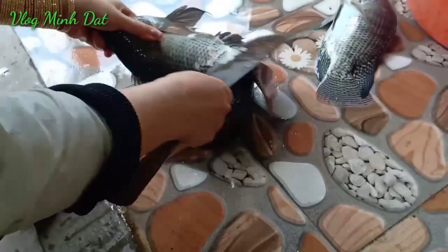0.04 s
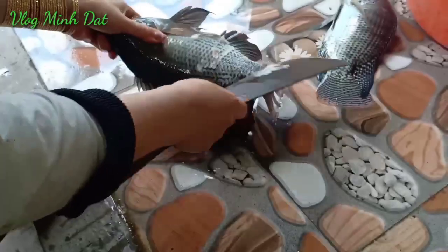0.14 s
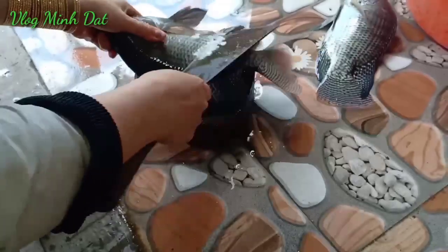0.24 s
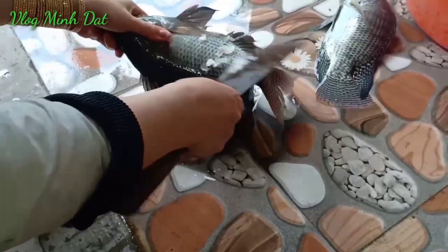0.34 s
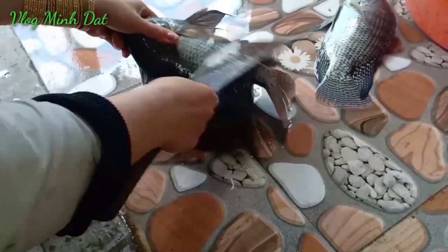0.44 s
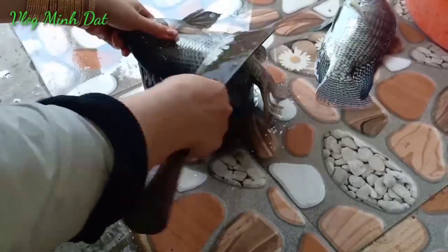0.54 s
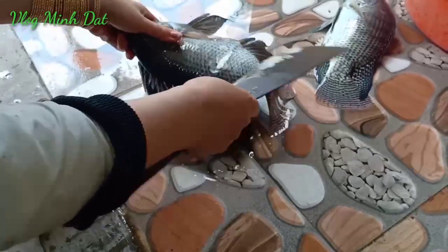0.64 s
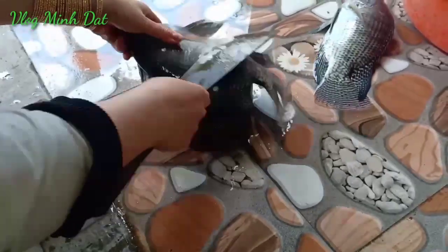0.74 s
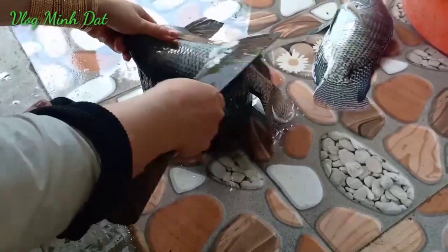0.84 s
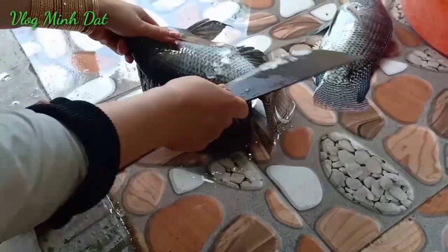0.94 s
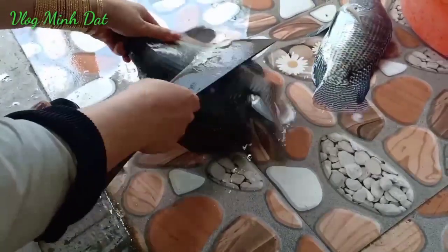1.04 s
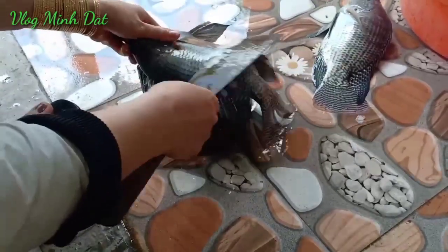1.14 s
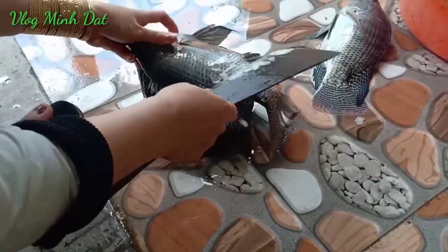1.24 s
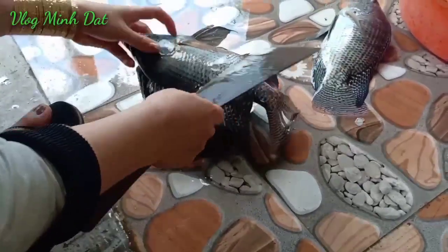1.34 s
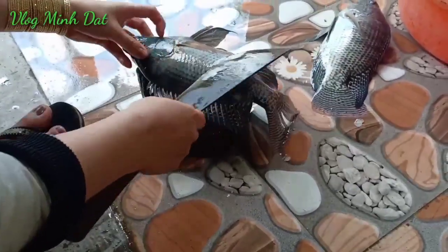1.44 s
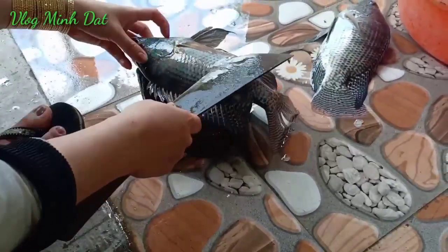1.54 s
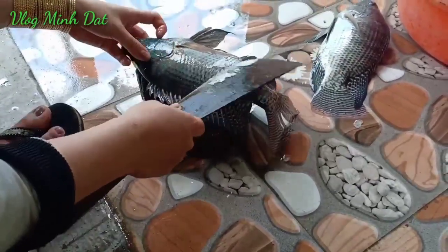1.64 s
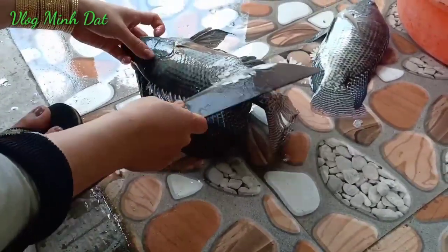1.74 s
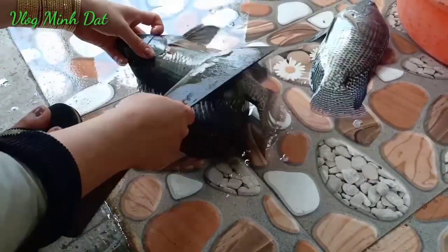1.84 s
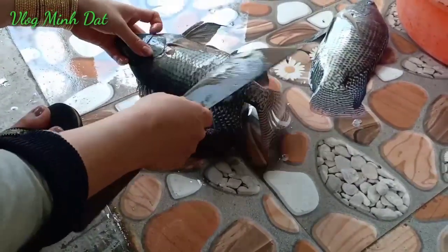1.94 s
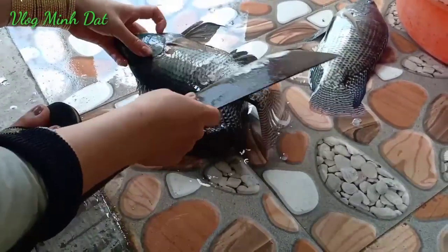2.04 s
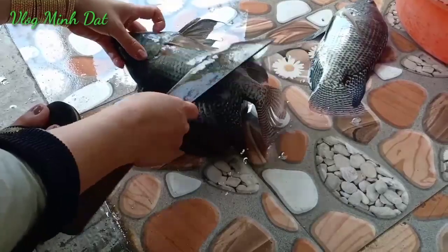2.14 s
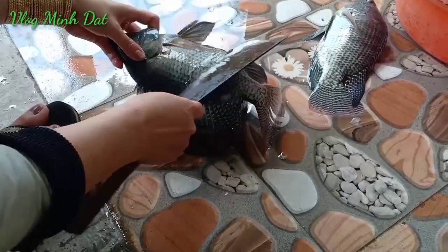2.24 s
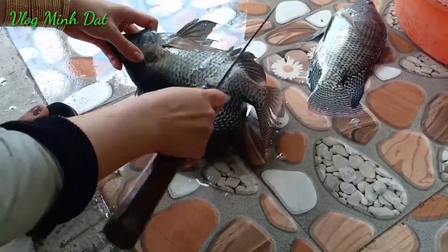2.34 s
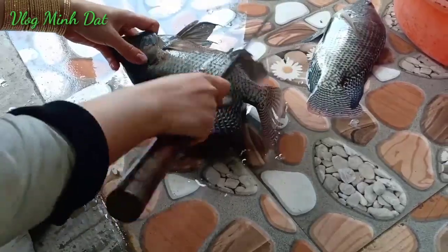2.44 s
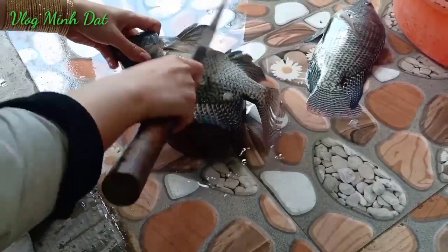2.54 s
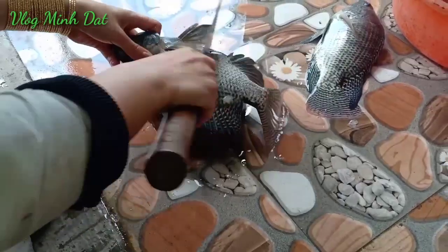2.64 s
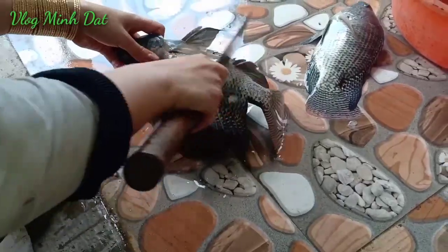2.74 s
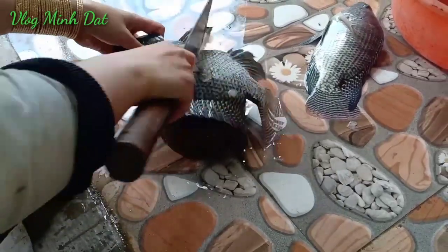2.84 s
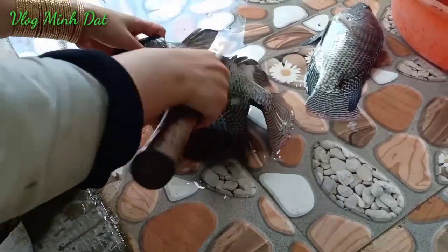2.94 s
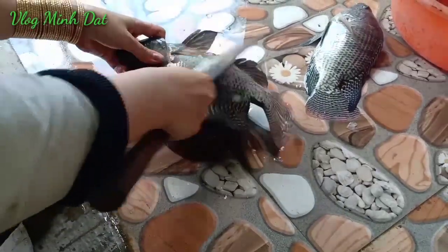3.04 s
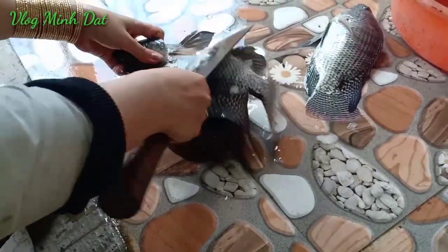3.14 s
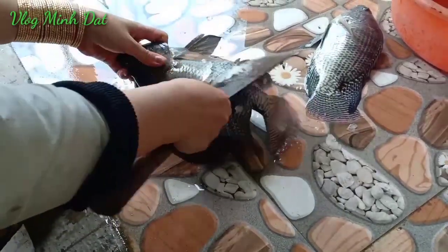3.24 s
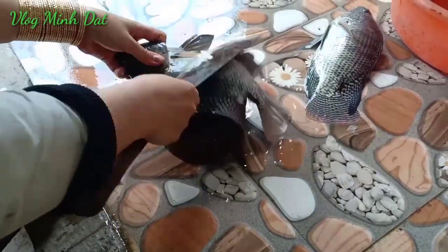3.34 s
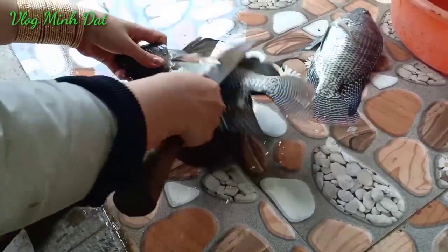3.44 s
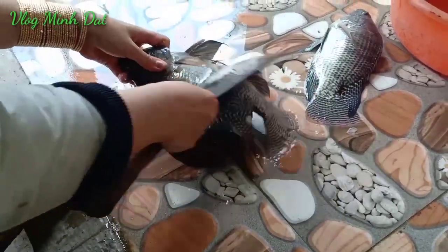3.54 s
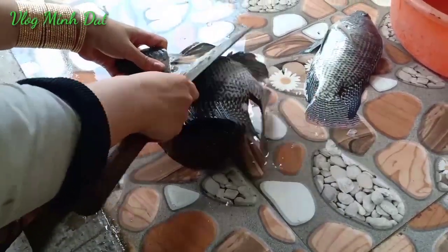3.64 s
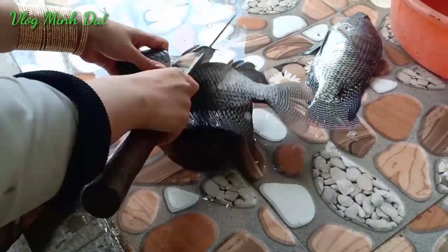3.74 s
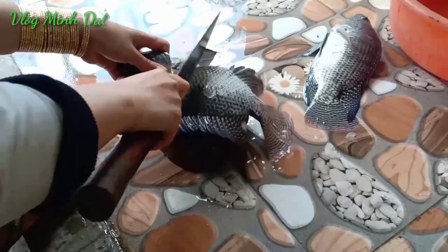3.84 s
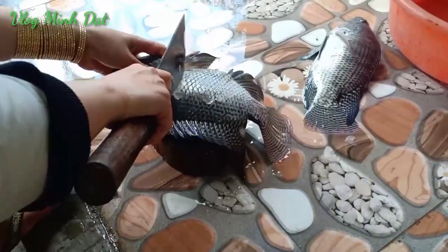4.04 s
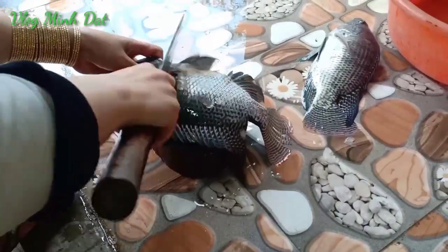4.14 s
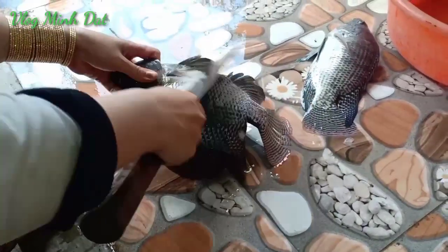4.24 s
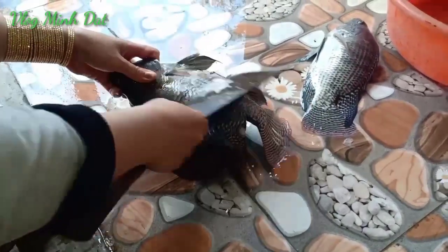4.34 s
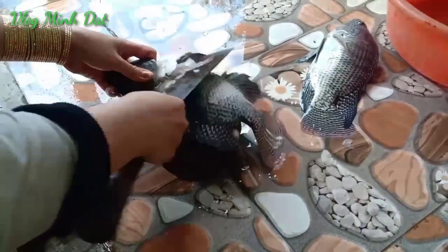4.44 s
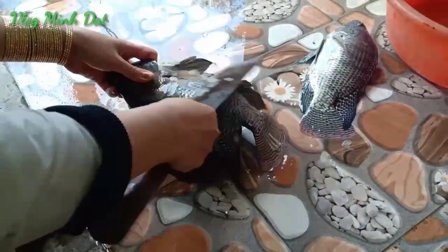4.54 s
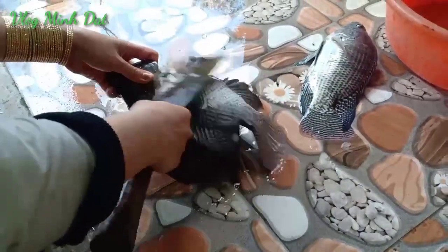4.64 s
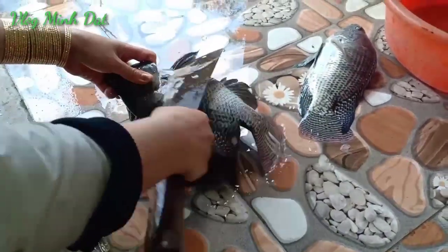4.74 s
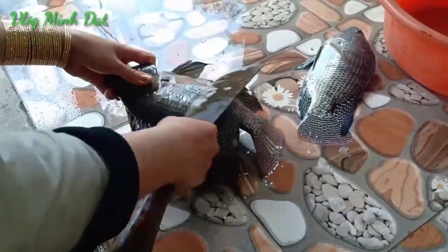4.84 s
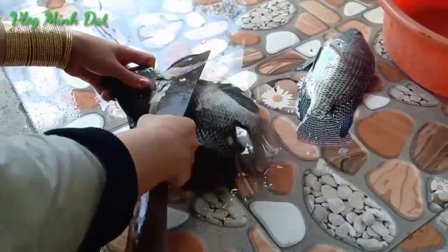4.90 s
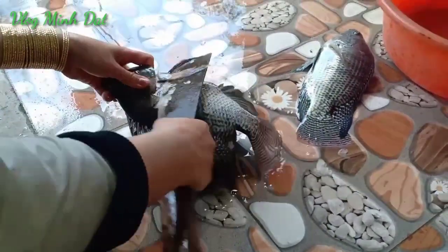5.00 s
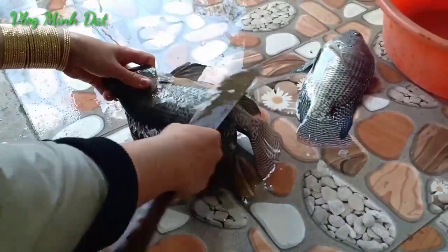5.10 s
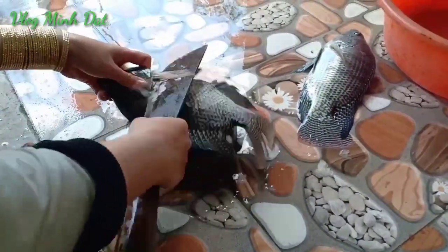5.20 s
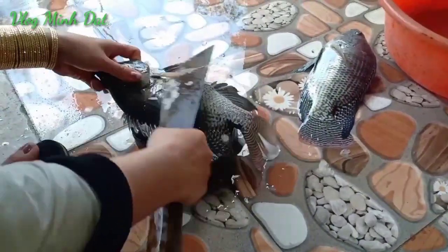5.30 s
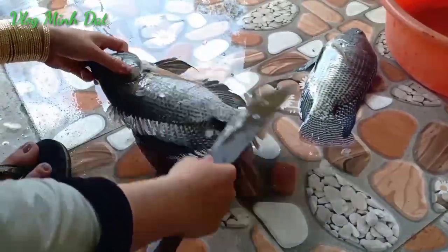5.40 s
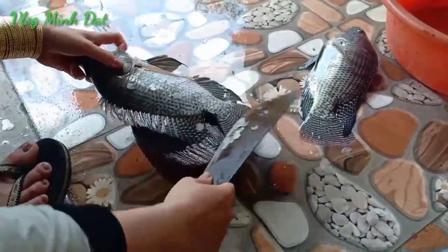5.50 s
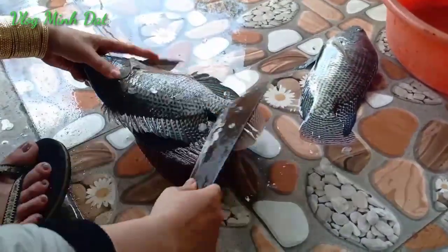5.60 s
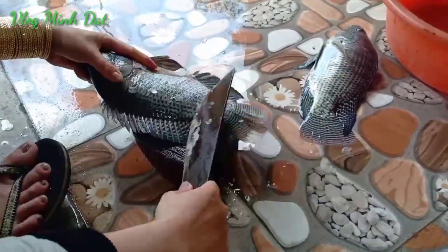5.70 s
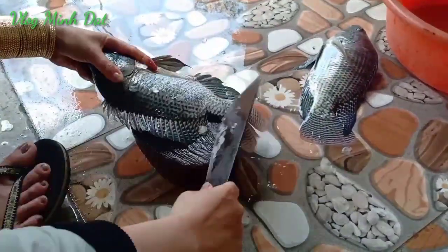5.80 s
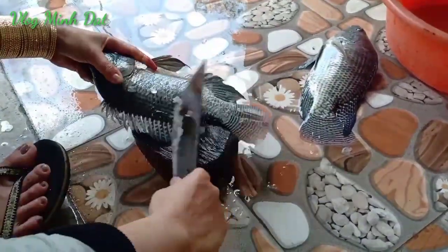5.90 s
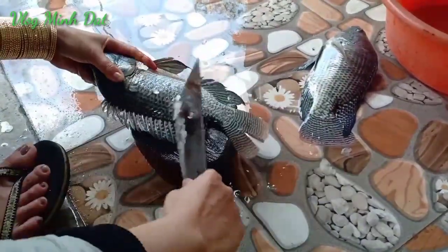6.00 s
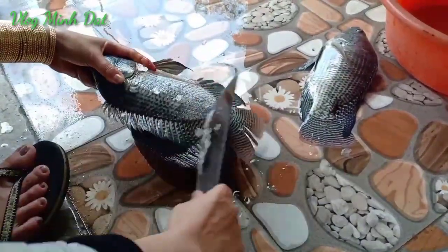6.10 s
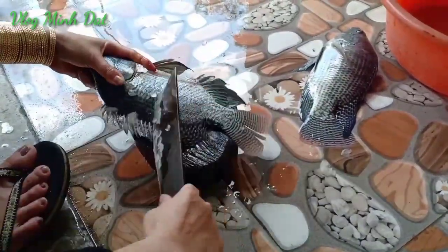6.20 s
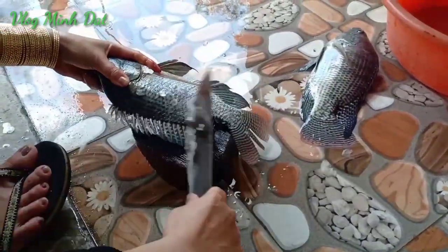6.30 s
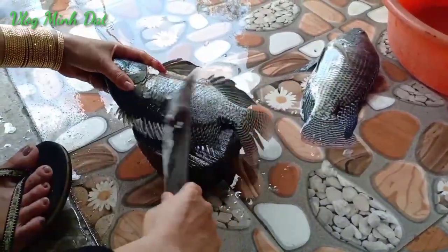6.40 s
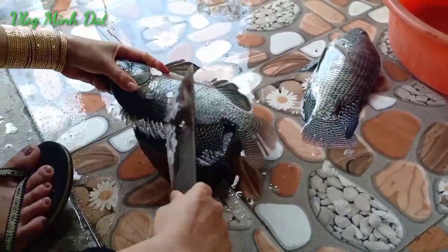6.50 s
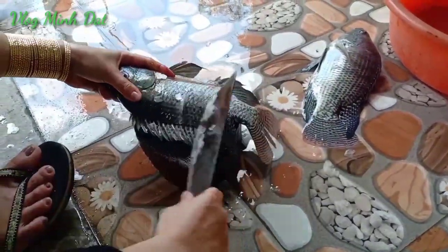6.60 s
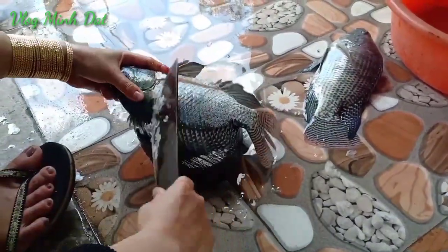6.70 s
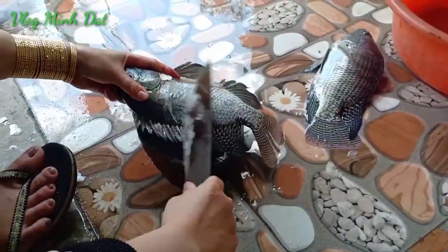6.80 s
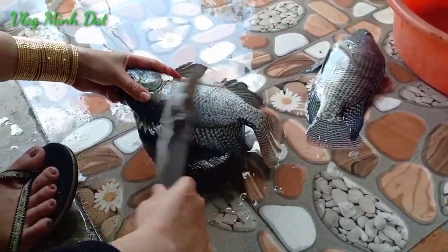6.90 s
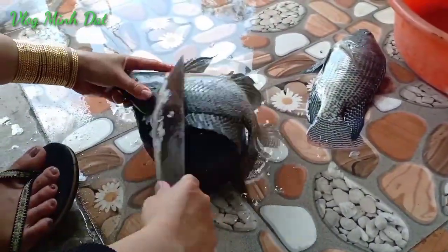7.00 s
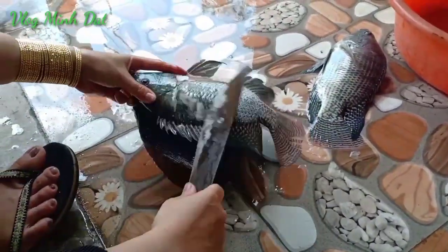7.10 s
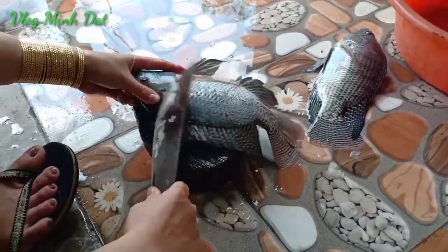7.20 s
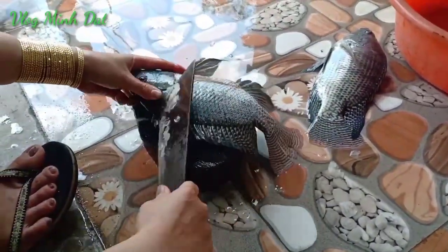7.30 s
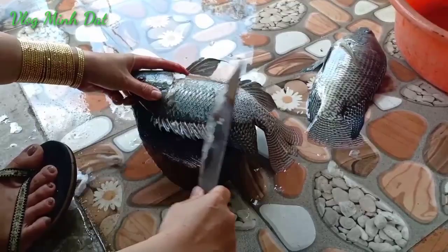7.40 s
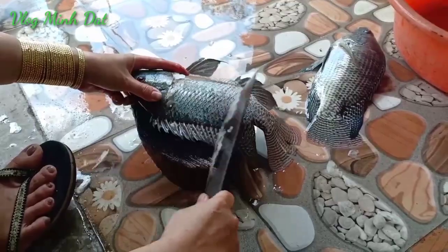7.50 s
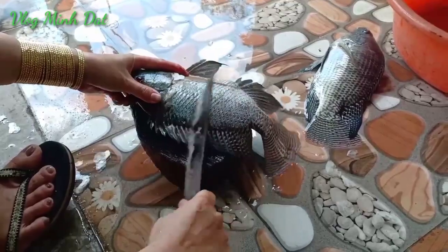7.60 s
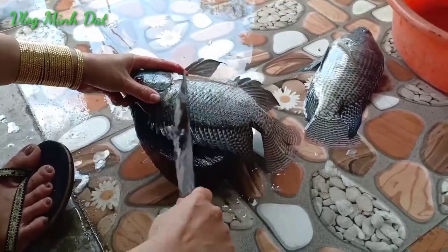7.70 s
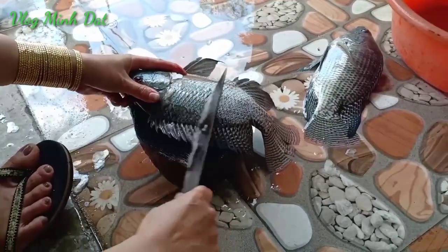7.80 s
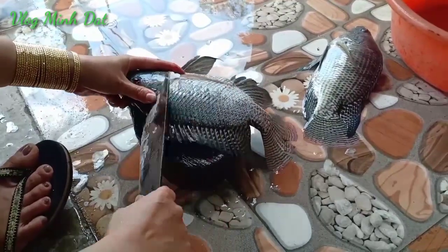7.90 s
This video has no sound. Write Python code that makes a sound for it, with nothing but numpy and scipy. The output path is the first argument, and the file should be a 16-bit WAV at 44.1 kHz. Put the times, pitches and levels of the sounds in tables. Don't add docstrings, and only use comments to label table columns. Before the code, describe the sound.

Very close, a knife scrapes a fish in short harsh rasps, each packed with tiny slips and pitched ticks as scales snap off. Early strokes bring wooden knocks and wet body slaps; after a quieter pause the scraping becomes fast and dense. Bangles jingle faintly and the blade rings near the end. A tiled yard with faint traffic, leaves and motor hum; stereo microphones favour a nasal resonance around 2 kHz.

```python
import sys
import numpy as np
from scipy import signal
from scipy.fft import rfft, irfft, next_fast_len
from scipy.io import wavfile
from scipy.ndimage import map_coordinates

SR = 44100
rng = np.random.default_rng(int(sys.argv[2]) if len(sys.argv) > 2 else 0)


def output_pcm(signal):
    pcm = np.clip(np.atleast_2d(signal).T, -1, 1) * 32767
    wavfile.write(sys.argv[1], SR, np.round(pcm).astype(np.int16))


def volts_from_decibels(level):
    exponent = np.asarray(level, float) / 20
    return 10 ** exponent


N = 350595


def rms_one(x):
    return x / np.sqrt(np.mean(x ** 2) + 1e-20)


def at_hz(points, hz):
    table_hz, value = np.transpose(points)
    return np.interp(np.log(hz + 1), np.log(table_hz), value)


def drift(rate_hz):
    r = np.exp(-2 * np.pi * rate_hz / SR)
    wander = signal.lfilter([1], [1, -2 * r, r * r], rng.standard_normal(N + SR))
    return rms_one(wander[SR:])


def band(x, low_hz, high_hz):
    return signal.sosfilt(signal.butter(2, [low_hz, high_hz], "band", fs=SR, output="sos"), x)


def ring(push, hz, t60_s):
    r, w = volts_from_decibels(-60 / (t60_s * SR)), 2 * np.pi * hz / SR
    return signal.lfilter([0, np.sin(w)], [1, -2 * r * np.cos(w), r * r], push + 1e-18)


def response(points):
    cepstrum = irfft(np.log(volts_from_decibels(at_hz(points, np.fft.rfftfreq(4096, 1 / SR)))))
    cepstrum[1:2048] *= 2
    return irfft(np.exp(rfft(cepstrum[:2049], 4096)))


def colour(x, points):
    return signal.fftconvolve(x, response(points))[:len(x)]


# pitch_hz, level_db
YARD_TONE = [(30, -20), (50, -13.5), (90, -9), (200, -14.5), (500, -9.5), (1160, -16.5), (2540, -13),
             (3300, -21.5), (5450, -21), (9700, -39.5), (14400, -34.5), (16000, -36)]
# pitch_hz, likeness (-1 to 1)
YARD_ALIKE = [(60, 0.86), (240, 0.61), (950, -0.049), (3770, -0.24), (15000, 0.046)]
# pitch_hz, level_db (rms)
MOTOR_HUM = [(415, -79.5), (585, -74.5)]


def yard():
    mid, side = (rfft(colour(rng.standard_normal(N) * volts_from_decibels(2.0 * drift(1.3)), YARD_TONE))
                 for _ in range(2))
    alike = at_hz(YARD_ALIKE, np.fft.rfftfreq(N, 1 / SR))
    opposite = [[1], [-1]]
    noise = irfft(np.sqrt(1 + alike) * mid + np.sqrt(1 - alike) * side * opposite, N)
    hum = sum(volts_from_decibels(db) * rms_one(ring(rng.standard_normal(N), hz, 0.98)) for hz, db in MOTOR_HUM)
    return volts_from_decibels(-60) * rms_one(noise) + hum


# start_s, level_db
BODY_SLAPS = [(.225, -43), (.49, -44), (.78, -34), (1.075, -38.5)]


def flops():
    t, fade = np.arange(N) / SR, 0
    for s, db in BODY_SLAPS:
        fade = fade + volts_from_decibels(db) * np.maximum(t - s, 0) / 0.016 * np.exp(-np.abs(t - s) / 0.013)
    deep = band(band(rng.standard_normal(N), 68, 340), 57, 470)
    return fade * rms_one(deep)


# start_s, peak_db, pitch_hz
FISH_KNOCKS = [(0.068, -32.5, 628), (0.217, -33, 695), (7.265, -40, 226), (7.24, -44, 650),
               (6.21, -37, 680), (4.35, -44, 760), (2.94, -46, 700), (0.345, -46, 750), (7.935, -40, 800),
               (3.095, -38, 210), (0.492, -31, 208), (0.773, -21, 667), (1.069, -25, 822),
               (1.862, -40.5, 272), (2.196, -45, 257), (2.597, -40.5, 783), (2.818, -36.5, 666),
               (3.08, -35.5, 337), (3.24, -41, 496), (3.338, -33, 330), (3.52, -43, 735), (3.61, -33, 217),
               (4.191, -28, 760), (4.436, -33.5, 212), (4.677, -36, 585), (4.713, -29, 231),
               (4.945, -40, 215), (4.965, -29, 726), (5.015, -28, 663), (5.195, -49, 222),
               (5.226, -34, 331), (5.897, -45, 686), (6.44, -42, 665), (6.976, -46, 221), (7.624, -41, 310),
               (7.653, -38, 578), (7.886, -33.5, 693)]


def thuds():
    out, t = np.zeros(N + 8192), np.arange(8192) / SR
    for s, peak_db, hz in FISH_KNOCKS:
        t60_s = 0.081 * (500 / hz) ** 0.38
        at = round(s * SR)
        fade = (1 - np.exp(-t / 0.0019)) * volts_from_decibels(-60 * t / t60_s)
        rattle = band(rng.standard_normal(len(t)), 195, 920)
        knock = np.sin(2 * np.pi * hz * t) + 3.74 * rattle
        out[at:at + len(t)] += volts_from_decibels(peak_db - 4.0) * fade * knock
    return out[:N]


def metal(shakes, modes):
    t, shake, out = np.arange(N) / SR, np.zeros(N), 0
    for s, db, length_s in shakes:
        since = np.maximum(t - s, 0) / length_s
        shake += volts_from_decibels(db) * since * np.exp(1 - since)
    for hz, db, t60_s in modes:
        uneven = volts_from_decibels(db - 42.5 + 4.0 * drift(90)) * shake
        rub = uneven * np.sin(2 * np.pi * hz * t + 0.7 * drift(45))
        out = out + ring(rub, hz, t60_s)
    return out


# start_s, level_db, length_s
WIDE_SHAKES = [(1.607, -72, .008), (1.675, -76, .008), (5.62, -62, .006), (5.722, -50, .007),
               (5.826, -50, .008), (5.86, -57, .01), (6.188, -50, .004), (7.755, -63, .008),
               (7.81, -59, .008)]
THIN_SHAKES = [(1.154, -66, .003), (1.49, -76, .005), (2.318, -59, .015), (2.35, -60, .012)]
BLADE_SINGS = [(.215, -48, .007), (.485, -46, .005), (4.23, -52, .01), (7.472, -47, .004), (7.5, -56, .012),
               (7.627, -35, .003), (7.655, -45, .005), (7.888, -40, .003), (7.925, -46, .006)]
# pitch_hz, level_db, t60_s
WIDE_MODES = [(2950, -4, .1), (3475, -3, .1), (3865, -3, .12), (4387, -3, .2), (5620, 2, .13),
              (6810, -5, .1), (7570, -8, .07), (10860, -9, .09), (12660, -15, .08), (13910, -10, .09)]
THIN_MODES = [(2950, -6, .12), (4840, 0, .14), (5609, -2, .14), (6525, -10, .12), (7547, -16, .1)]
BLADE_MODES = [(4441, -4, .12), (5480, 0, .07), (3800, -10, .07), (6480, -14, .07)]


def bangles():
    wrist = metal(WIDE_SHAKES, WIDE_MODES) + metal(THIN_SHAKES, THIN_MODES)
    return wrist + metal(BLADE_SINGS, BLADE_MODES)


# pitch_hz, level_db, t60_s
WOOD_MODES = [(232, -5.5, 0.11), (337, 2, 0.042), (670, 5.5, 0.036), (806, 7.5, 0.021)]


def block(push):
    modes = sum(volts_from_decibels(db) * ring(push, hz, t60_s) for hz, db, t60_s in WOOD_MODES)
    return band(band(push, 145, 930) * volts_from_decibels(38.5) + modes, 120, 2800)


# start_s, swell_s, rasp_db, brightness_db, t60_s
SCRAPE_STROKES = [(0.065, 0.0079, -42, -7.5, 0.11), (0.221, 0.012, -39.5, 2.5, 0.19),
                  (0.487, 0.0073, -32.5, -4, 0.14), (0.777, 0.0048, -32, -5.5, 0.27),
                  (1.091, 0.013, -36, 0, 0.2), (1.865, 0.01, -44, 2.5, 0.094),
                  (2.53, 0.0052, -37, -5, 0.25), (2.84, 0.056, -37.5, -5.5, 0.19),
                  (3.097, 0.04, -34, -5, 0.12), (3.349, 0.016, -34, -4, 0.17),
                  (3.611, 0.036, -37, -4.5, 0.18), (4.199, 0.019, -32.5, -8, 0.2),
                  (4.44, 0.025, -26.5, -2, 0.13), (4.683, 0.01, -33.5, -3, 0.21),
                  (4.963, 0.028, -30.5, -8, 0.064), (5.194, 0.0082, -32, -8, 0.28),
                  (5.946, 0.036, -36.5, -1.5, 0.25), (6.18, 0.0088, -39, -3, 0.3),
                  (6.472, 0.027, -35, -4.5, 0.11), (6.731, 0.029, -32, -6, 0.19),
                  (6.996, 0.028, -29, -4.5, 0.11), (7.283, 0.06, -39, -6, 0.13),
                  (7.638, 0.016, -33, -10, 0.03), (7.891, 0.016, -38, -1, 0.081)]
# start_s, rasp_db, brightness_db, t60_s
ROW_CATCHES = [(0.816, -42, -20, 0.065), (1.896, -45, -4.5, 0.091), (2.57, -43, 3.5, 0.18),
               (2.596, -38, -4, 0.1), (3.702, -62, 6, 0.16), (4.705, -29.5, -7.5, 0.086),
               (5.227, -31.5, -7, 0.032), (5.734, -43, 2, 0.061), (5.841, -46.5, 3, 0.075),
               (6.21, -37.5, -7, 0.15), (6.238, -38.5, -3.5, 0.08), (6.755, -35, -6, 0.092),
               (7.664, -37, -8, 0.2), (7.826, -46, -6, 0.081), (7.929, -33, -4, 0.085)]
# start_s, swell_s, rasp_db, brightness_db
BLADE_DRAGS = [(0.335, 0.03, -52, -7), (2.342, 0.06, -48, 0), (2.71, 0.045, -49, -4.5),
               (2.934, 0.031, -49.5, -5.5), (3.739, 0.02, -50.5, -0.5), (3.81, 0.093, -42, -6),
               (3.942, 0.057, -50.5, -4), (4.02, 0.097, -40, -12), (4.08, 0.051, -46, -6),
               (4.147, 0.045, -47, -4.5), (4.321, 0.085, -52, -6), (4.597, 0.053, -54.5, -4),
               (4.86, 0.16, -51, -6.5), (5.129, 0.05, -51.5, -15), (5.401, 0.071, -52, -6.5),
               (5.46, 0.047, -50.5, -7.5), (5.7, 0.05, -47, -1.5), (6.35, 0.081, -61, 0),
               (7.39, 0.022, -66.5, 6), (7.488, 0.018, -48, -1), (7.53, 0.092, -49.5, -17),
               (7.561, 0.021, -46, -13)]
# start_s, rasp_db, brightness_db
BLADE_TOUCHES = [(2.797, -43.5, -11), (3.485, -54, -4), (2.238, -54, -10), (0.084, -46.5, -12),
                 (0.545, -46.5, -5), (1.2, -56, -10), (1.37, -62, -8), (5.625, -48.5, -7.5),
                 (6.552, -49.5, -2.5), (1.488, -58, -6), (1.604, -58, -5), (1.79, -61.5, -19),
                 (1.938, -52.5, -10), (2.145, -55, -28), (2.199, -48.5, -2), (2.276, -43, -5),
                 (2.459, -56, -22), (2.51, -51, -4), (3.176, -60, 6.5), (3.24, -48, -10), (3.525, -46, -7),
                 (3.67, -46.5, -3), (5.592, -47, -9), (5.658, -64, 9), (6.129, -60, 4.5), (6.601, -56, -7),
                 (7.14, -55, 3)]


def contacts():
    rows = []
    for s, swell, db, bright_db, t60_s in SCRAPE_STROKES:
        rows.append((s, swell, 0.0068, db, bright_db, t60_s))
        rows.append((s + 0.07, 0.019, 0.012, db - 20, bright_db + 0.5, 0.44))
    rows += [(s, 0.022, 0.0084, db, bright_db, t60_s) for s, db, bright_db, t60_s in ROW_CATCHES]
    rows += [(s, swell, 0.021, db, bright_db, 0.18) for s, swell, db, bright_db in BLADE_DRAGS]
    rows += [(s, 0.0077, 0.0059, db, bright_db, 0.22) for s, db, bright_db in BLADE_TOUCHES]
    return rows


def grains(per_s, spread_db):
    sizes = volts_from_decibels(spread_db * np.minimum(rng.exponential(1, N), 4)) * rng.choice([-1, 1], N)
    return rms_one(sizes * (rng.random(N) < per_s / SR))


# pitch_hz, level_db (per Hz)
KNIFE_TONE = [(530, -45), (900, -17), (1000, -13), (1410, -17), (2110, -7), (2500, -4.5), (3470, -10),
              (4330, -8.5), (5260, -9), (9900, -27), (12600, -23.5), (14300, -22.5), (15700, -22),
              (16500, -57)]
FLAT_FROM_S = 7.44


def rasp():
    t = np.arange(0, N, 32) / SR
    body_power, hiss_power = 1e-12, 1e-12
    for s, swell, hold, rasp_db, bright_db, t60_s in contacts():
        fade_db = 15 * np.maximum(s - t, 0) / swell + 60 * np.maximum(t - s - hold, 0) / t60_s
        body_power = body_power + volts_from_decibels(rasp_db - fade_db) ** 2
        hiss_power = hiss_power + volts_from_decibels(rasp_db + bright_db - fade_db) ** 2
    body, hiss = (np.interp(np.arange(N) / SR, t, np.sqrt(p)) for p in (body_power, hiss_power))
    clumps = volts_from_decibels(2.2 * drift(75))
    slips = colour(clumps * (grains(1800, 1.7) + .5 * rng.standard_normal(N)), KNIFE_TONE)
    hum = volts_from_decibels(-19.5) * rms_one(block(grains(900, 3.7))) * (body + hiss)
    flat = 0.29 * (np.arange(N) > FLAT_FROM_S * SR)
    flat_hz, width_hz = 2124, 810
    narrow = volts_from_decibels(0.5) * rms_one(band(slips, flat_hz - width_hz / 2, flat_hz + width_hz / 2))
    broad = volts_from_decibels(-1.0) * rms_one(band(band(slips, 1500, 2750), 1150, 3000))
    bright = volts_from_decibels(2.3) * rms_one(band(slips, 3900, 19400))
    return (broad * (1 - flat) + narrow * flat) * body + bright * hiss + hum


# start_s, peak_db, pitch_hz,
# crack_db
CRACKED_SCALES = [(0.0683, -24.5, 2230, -14.5), (0.7833, -14, 2300, -8), (0.8166, -20.5, 1980, -21),
                  (1.0748, -25.5, 2280, -3.5), (1.107, -22, 2520, -26), (2.2818, -28, 1900, -22),
                  (2.8236, -16, 2250, -10), (3.245, -20, 2160, -40), (3.3621, -23.5, 2590, 1),
                  (3.6987, -20.5, 2170, -6), (4.0199, -21.5, 2630, -28), (4.1954, -16.5, 2530, -5.5),
                  (4.2112, -23, 2020, -17), (4.4393, -22, 2330, -13), (4.4538, -12.5, 2350, -10),
                  (4.6836, -16.5, 2220, -22), (4.7061, -18, 2160, -13), (4.7112, -19.5, 2660, -16),
                  (4.7203, -19, 2340, -5.5), (4.9513, -16.5, 2460, -15), (5.1996, -16, 2370, -11),
                  (5.2313, -25, 2250, -20), (5.235, -17.5, 2010, -19), (5.9676, -25, 2340, -3),
                  (6.9889, -24.5, 2480, -2), (7.004, -26, 2220, 3.5), (7.6325, -12, 2090, -19),
                  (7.6593, -20.5, 2160, -10), (7.8935, -16, 2060, -13), (7.9385, -30, 2360, -13),
                  (7.5283, -33, 1990, -15), (7.5651, -36, 2090, -15), (7.6003, -38, 2070, -15),
                  (7.8129, -31, 2160, -15), (7.9341, -27, 2350, -14), (0.088, -36, 2250, -20),
                  (1.198, -48, 2000, -5), (1.335, -57, 1500, -2), (1.37, -57, 1400, -15),
                  (1.503, -54, 2400, -3), (1.612, -54, 2300, -4), (1.79, -53, 2300, -12),
                  (2.148, -52, 2500, -20), (6.366, -42, 2300, -3), (6.557, -38, 2200, -3)]
# start_s, peak_db, pitch_hz
SOFT_SCALES = [(0.0609, -37.0, 2130), (0.4778, -33.5, 2060), (0.4839, -25.5, 2540), (0.4996, -25.0, 2790),
               (0.5423, -34.0, 1780), (0.8299, -28.5, 1970), (1.0704, -27.0, 2630), (1.1108, -26.5, 2330),
               (1.8969, -31.5, 2130), (2.2386, -43.0, 1920), (2.32, -37.0, 2200), (2.5134, -39.5, 1850),
               (2.724, -39.0, 1580), (2.7563, -42.5, 2430), (2.7975, -35.0, 2620), (2.833, -27.5, 2030),
               (2.8568, -29.0, 2330), (3.071, -32.5, 2420), (3.0998, -27.0, 2490), (3.144, -33.0, 2340),
               (3.3526, -25.0, 2450), (3.4174, -39.5, 2370), (3.4859, -43.5, 1970), (3.5129, -40.5, 1810),
               (3.5272, -28.5, 2100), (3.5313, -33.5, 2250), (3.5963, -32.5, 2060), (3.6752, -34.5, 2410),
               (3.7627, -35.0, 2570), (3.7983, -33.0, 2000), (3.8148, -30.0, 2350), (3.9925, -36.0, 1810),
               (4.0007, -34.0, 2720), (4.0594, -30.0, 2870), (4.0766, -25.0, 2220), (4.3247, -34.0, 2350),
               (4.4202, -26.5, 2400), (4.6661, -43.0, 2350), (4.9693, -21.0, 2430), (4.9736, -21.5, 1860),
               (5.146, -37.0, 2090), (5.1925, -22.0, 2490), (5.2472, -27.0, 1850), (5.4663, -38.0, 2240),
               (5.591, -41.0, 2700), (5.5976, -37.5, 2680), (5.6019, -39.5, 2800), (5.7037, -28.0, 2150),
               (5.9017, -38.5, 2970), (5.9147, -35.0, 2580), (6.2449, -29.0, 2620), (6.3349, -42.5, 2670),
               (6.4337, -34.0, 2090), (6.4586, -31.0, 2700), (6.4814, -23.5, 2270), (7.1818, -40.5, 2440),
               (7.2872, -25.0, 2580), (7.4797, -33.0, 2010), (7.5012, -30.0, 2030), (7.518, -31.0, 2050)]
# start_s, peak_db, pitch_hz
STIFF_SCALES = [(0.2168, -37.0, 2520), (0.2413, -29.0, 2550), (0.4895, -28.0, 2670), (0.5037, -29.5, 2260),
                (0.7775, -21.0, 2450), (0.7892, -23.0, 2030), (1.0801, -27.0, 2310), (1.138, -35.0, 2660),
                (1.8681, -36.0, 2170), (1.9334, -38.0, 2660), (2.5314, -28.0, 1870), (2.5378, -30.0, 1880),
                (2.5425, -29.0, 2840), (2.5953, -29.0, 1910), (3.1074, -28.5, 1910), (3.1253, -35.0, 2660),
                (3.182, -42.0, 2080), (3.6158, -29.5, 2240), (3.9411, -35.5, 2210), (4.142, -25.5, 2260),
                (4.2009, -22.5, 2440), (5.6614, -37.0, 2580), (5.7327, -31.5, 2800), (5.8456, -32.5, 2910),
                (5.9437, -24.5, 2450), (5.9603, -23.0, 2430), (5.9881, -31.5, 2020), (6.0069, -33.0, 2440),
                (6.1894, -24.5, 2280), (6.2629, -33.5, 2310), (6.7234, -27.5, 2590), (6.7476, -24.0, 2470),
                (6.7641, -24.5, 2230), (6.7734, -29.0, 2230), (6.9935, -23.0, 2030), (7.0185, -26.5, 2470),
                (7.0702, -30.5, 2730), (7.2819, -26.5, 2290)]


def scales():
    rows = list(CRACKED_SCALES)
    for small, crack_db in ((SOFT_SCALES, -14), (STIFF_SCALES, -4)):
        rows += [(s, db - 2.5, hz, crack_db) for s, db, hz in small]
    return rows


def snaps():
    tick, crack = np.zeros((2, N + 2048))
    t = np.arange(2048) / SR
    for s, peak_db, hz, crack_db in scales():
        slower = 2.2 if s > FLAT_FROM_S else 1
        at = round((s - .0016 * slower) * SR)
        noise = rng.standard_normal((2, len(t)))
        rise = 1 - np.exp(-(t / slower / 0.00083) ** 2)
        swing = volts_from_decibels(-60 * t / slower / 0.0076) * np.sin(2 * np.pi * hz * t)
        swing = swing + 0.25 * volts_from_decibels(-60 * t / 0.03) * band(noise[0], 1700, 2900)
        crack_fade = 1.3 * volts_from_decibels(-60 * t / 0.012) + 0.4 * volts_from_decibels(-60 * t / 0.045)
        tick[at:at + len(t)] += volts_from_decibels(peak_db + 10.8) * rise * swing
        crack[at:at + len(t)] += volts_from_decibels(peak_db + crack_db) * noise[1] * rise * crack_fade
    edge = band(response(KNIFE_TONE), 3760, 19000)
    crack = band(colour(crack, KNIFE_TONE), 4240, 21000) / np.linalg.norm(edge)
    return (tick + volts_from_decibels(3.5) * crack)[:N]


# pitch_hz, share (0 to 1)
ALIKE_SHARE = [(300, 0.97), (800, 0.8), (1300, 0.41), (2200, 0.79), (5000, 0.37), (15000, 0.37)]


def ports(x):
    late = map_coordinates(x, [np.arange(N) - 4.0 - 1.35 * drift(4.46)], order=3)
    size = next_fast_len(N + SR)
    share = at_hz(ALIKE_SHARE, np.fft.rfftfreq(size, 1 / SR))
    t = np.arange(SR // 2) / SR
    out = []
    for direct in (late, x):
        paths, turn = 0, 1.44 * drift(5.6)
        for weight in (np.cos(turn), np.sin(turn)):
            scatter = rng.standard_normal(len(t)) * volts_from_decibels(-60 * t / 0.0041)
            walls = rng.standard_normal(len(t)) * volts_from_decibels(-60 * t / 0.17) * (t > .006)
            walls = band(walls, 350, 10800)
            near = rfft(scatter, size)
            near = near / np.abs(near) ** .92
            near = near / np.sqrt(np.mean(np.abs(near) ** 2))
            echo = near + volts_from_decibels(-10.0) * rfft(walls / np.linalg.norm(walls), size)
            paths = paths + echo * rfft(x * weight, size)
        both = np.sqrt(share) * rfft(direct, size) + np.sqrt(1 - share) * paths
        out.append(irfft(both, size)[:N])
    return np.array(out)


def scene():
    return ports(rasp() + snaps() + thuds() + bangles()) + yard() + flops()


def top_cut(x):
    return signal.sosfilt(signal.butter(12, 16650, fs=SR, output="sos"), x)


# pitch_hz, left_minus_right_db
PORT_TILT = [(700, 0.5), (1300, 0.5), (2100, 7), (3000, 10.5), (3800, 3.5), (5200, -4.5), (6500, 1.5),
             (8300, 2.5), (10000, 8), (12000, 4.5), (15000, 4)]


def record(dry):
    tilt = np.array(PORT_TILT) * [1, .5]
    x = np.array([colour(dry[0], tilt), colour(dry[1], tilt * [1, -1])])
    top = signal.cheby1(6, .5, 15600, fs=SR, output="sos")
    mix = signal.sosfilt(top, x) + .00096
    return top_cut(mix)


dry = scene()
out = record(dry)
output_pcm(out)
```